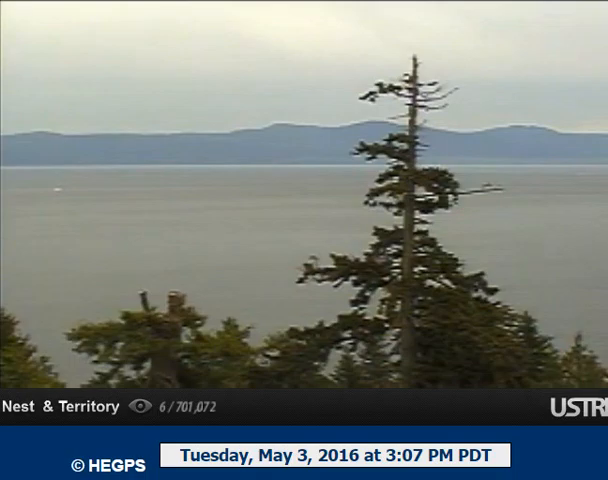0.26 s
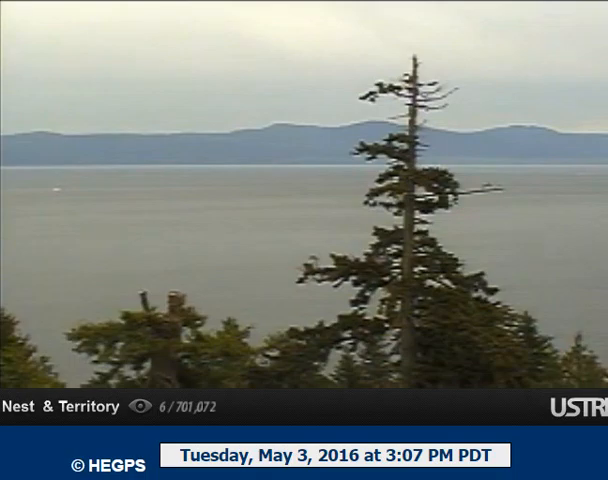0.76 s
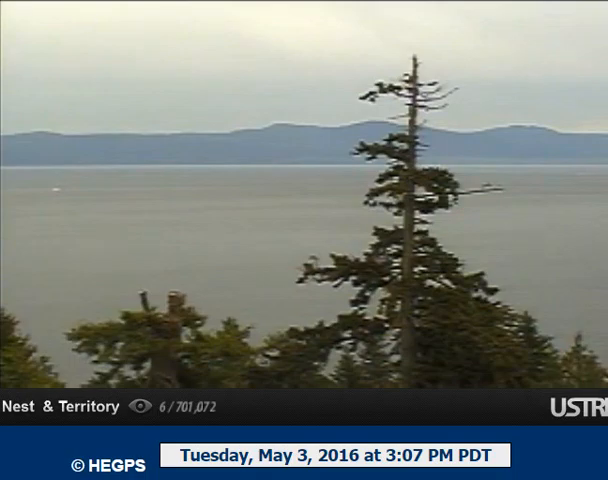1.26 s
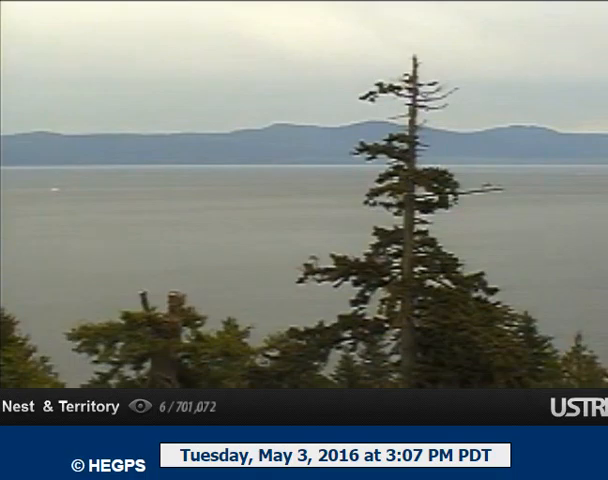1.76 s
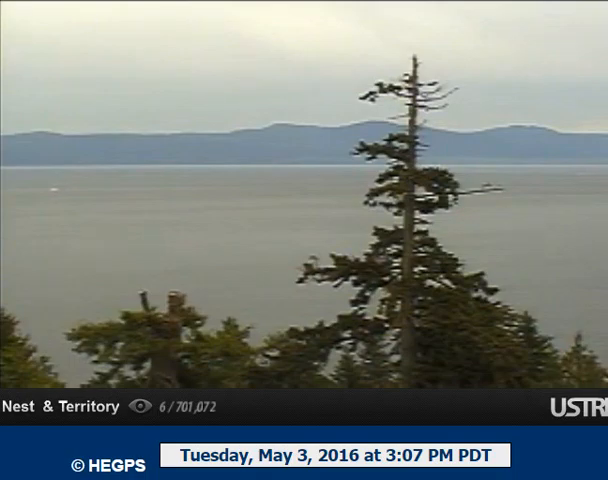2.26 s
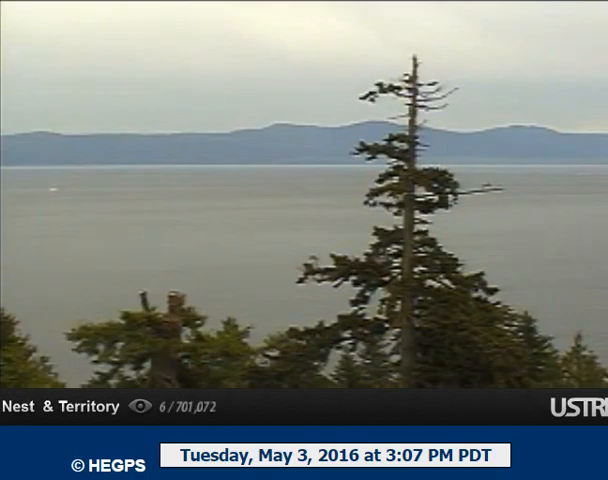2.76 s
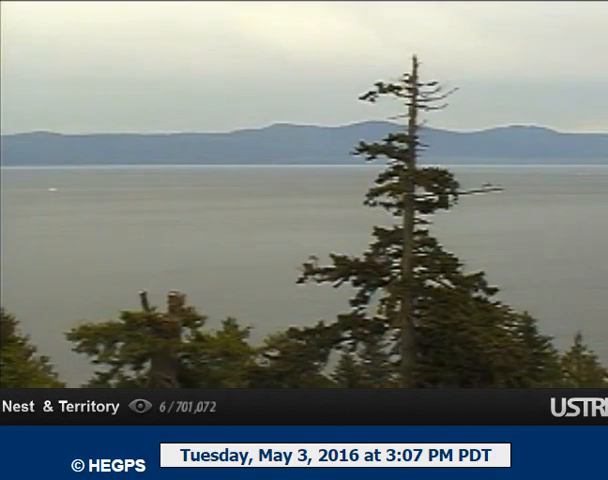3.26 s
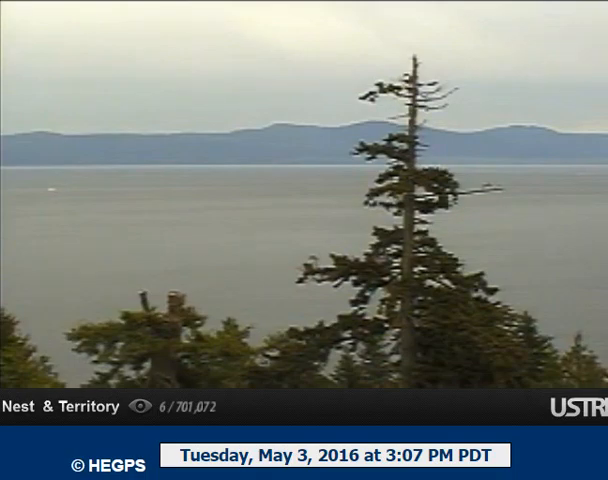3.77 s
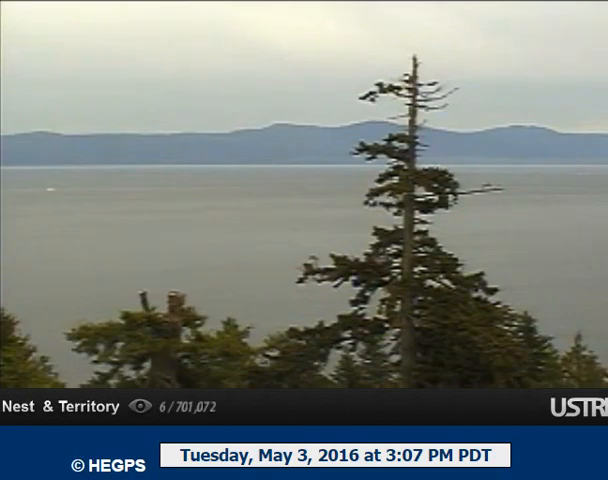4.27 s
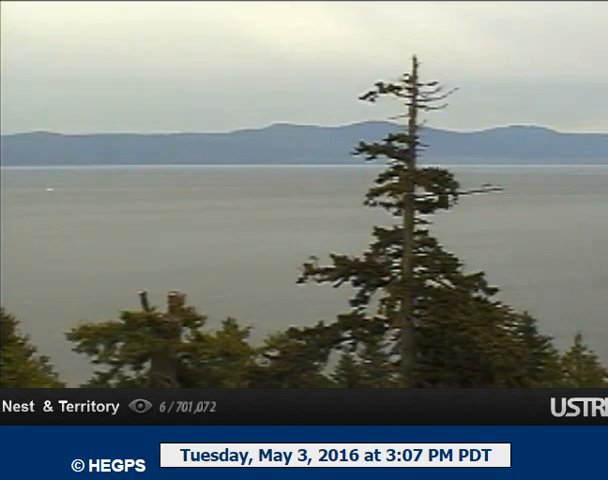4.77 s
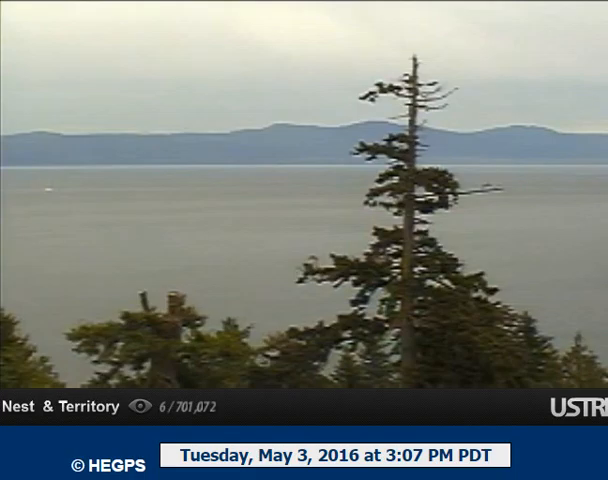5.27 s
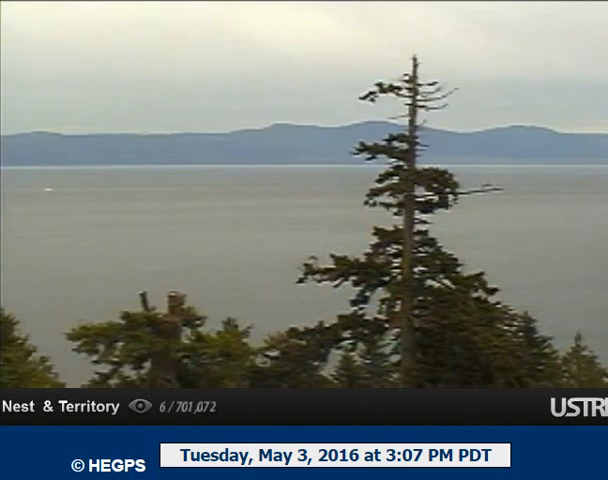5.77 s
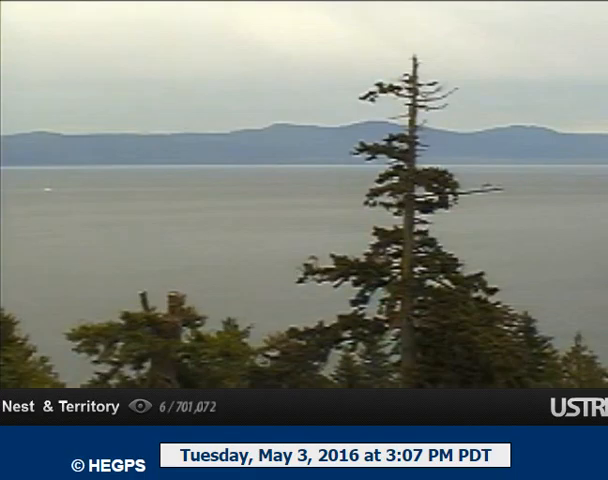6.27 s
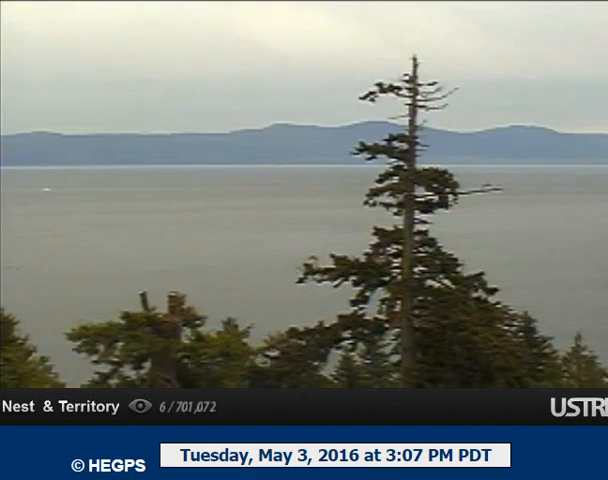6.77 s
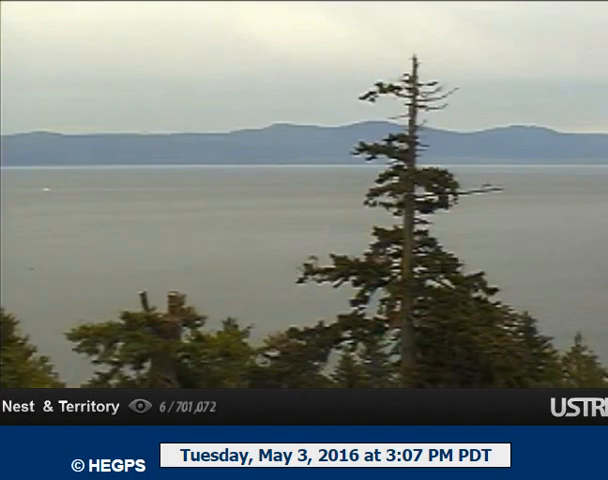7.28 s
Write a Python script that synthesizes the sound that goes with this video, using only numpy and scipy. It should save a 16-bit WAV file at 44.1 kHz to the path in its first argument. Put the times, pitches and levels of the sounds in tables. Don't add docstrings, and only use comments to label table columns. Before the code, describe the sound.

Heavy wind booms and thumps on a microphone while a pair of eagles chitter in short piping whistles, first together, then one alone.

```python
import sys
import numpy as np
from scipy import signal
from scipy.fft import rfft, irfft, next_fast_len
from scipy.io import wavfile
from scipy.ndimage import uniform_filter1d, map_coordinates

SR = 44100
rng = np.random.default_rng(int(sys.argv[2]) if len(sys.argv) > 2 else 0)


def inscribe(sig):
    pcm = np.round(np.clip(np.atleast_2d(sig).T, -1, 1) * 32767)
    wavfile.write(sys.argv[1], SR, pcm.astype(np.int16))


def ratio(d):
    e = np.asarray(d, float) / 20
    return 10 ** e


N = 332514

# time in seconds, level in dB.
WIND = [(0, -20), (.43, -17), (0.599, -18.5), (1.0, -19.5), (1.2, -17), (1.45, -15), (1.8, -18.5),
        (2.4, -16), (3.04, -18), (3.25, -15.5), (3.618, -16), (3.9, -17), (4.43, -16.5), (4.9, -17.5),
        (5.6, -14.5), (6.6, -18), (7.3, -16.5), (7.54, -17)]
# frequency in Hz, density in dB per Hz.
HOUSING_SPECTRUM = [(56, -27.5), (95, -4), (119, 4.5), (133, 1), (210, -21), (300, -37.5), (390, -58),
                    (660, -120)]
# time in seconds, change
# in dB.
EDDIES = [(.08, 0.5), (.43, 2), (.52, 1.5), (.86, 1), (.94, 0.5), (1.01, 4.5), (1.07, -6), (1.17, 2.5),
          (1.28, 0.5), (1.49, 2), (2.05, 2), (2.16, -3.5), (2.35, -0.5), (2.84, 3.5), (2.96, 0.5),
          (3.04, -3.5), (3.18, 4.5), (3.22, -8), (3.28, 2.5), (3.63, 3.5), (4.22, 1), (4.3, -1.5),
          (4.45, 3.5), (5.37, 1), (5.44, -3), (5.63, 1.5), (6.83, 1), (6.91, -3), (6.99, 3), (7.37, 5),
          (7.54, -4)]
# frequency in Hz, density in dB per Hz.
PORT_SPECTRUM = [(12, -50), (20, -11.5), (95, 3.5), (120, -29), (210, -120)]
# time in seconds, level over the buffet in dB.
PUFFS = [(.08, 6.5), (.52, 1), (.86, 6.5), (1.72, 2.5), (1.89, 3), (2.12, 7.5), (2.39, 8.5), (2.79, 0.5),
         (3.21, 1), (3.76, 6.5), (4.3, 4), (5.08, 10), (5.44, 9), (5.65, 6.5), (5.96, 4), (6.26, 11.5),
         (6.51, 10.5), (6.7, 8.5), (6.83, 15), (7.03, 10), (7.15, 11.5), (7.29, 7.5), (7.46, 10.5)]
# time of negative crest in seconds, peak in dB, pitch in Hz.
SURGES = [(.8683, -5.2, 120), (2.4044, -6, 120), (3.1596, -6, 120), (3.4, -6.2, 120), (3.6134, -5.4, 120),
          (4.1432, -6, 120), (4.2001, -6, 120), (5.0996, -6.2, 120), (5.6575, -5.5, 120),
          (6.2701, -5.8, 120), (6.5206, -3.6, 105), (6.817, -5, 115), (6.9727, -3.6, 122),
          (7.1004, -4.8, 120), (7.2058, -5.6, 125), (7.345, -4.8, 120)]
# time in seconds, dB over the clipping level.
CRESTS = [(1.9, .4), (2.0656, .9), (2.0737, 1), (2.1107, .4), (2.3534, .4), (2.3605, .4), (2.4002, 1),
          (2.4504, 1.2), (2.4576, .4), (2.4945, .4), (2.51, .6), (2.5876, .3), (2.947, 1.2), (2.9547, .7),
          (3.0047, .3), (3.3622, .3), (3.4206, .4), (3.4735, .3), (3.5139, .6), (3.7644, 1), (4.196, 1),
          (4.204, .7), (4.2196, .7), (4.2812, .5), (5.8138, .6), (6.2909, .8), (6.7851, .8), (6.798, .5),
          (7.0592, .8), (7.1118, 1.5), (7.1193, .5), (7.1336, .8), (7.1499, 1.5), (7.1628, 1),
          (7.2018, 1.5), (7.21, 1.2), (7.231, .4), (7.2692, 1)]
# frequency in Hz, density in dB per Hz.
TREES_SPECTRUM = [(140, -27), (230, 0), (276, -5), (345, -1), (468, -18), (563, -10), (719, -20.5),
                  (783, -18.5), (1280, -24), (1960, -32), (2170, -29), (3670, -36.5), (4300, -38),
                  (5590, -70.5), (9460, -120)]
# frequency in Hz, level in dB.
MAINS_OVERTONES = [(420, -65), (540, -73), (660, -60), (780, -62.5), (900, -64.5), (1020, -64), (1140, -65),
                   (1260, -63.5), (1380, -67.5), (1500, -76), (1620, -72), (1740, -67), (1860, -69.5),
                   (2100, -70), (2220, -67.5), (2340, -72.5), (2460, -75.5), (2580, -68.5), (2700, -72),
                   (2820, -67.5), (3060, -69), (3180, -70.5), (3300, -67.5), (3420, -78.5), (3540, -69),
                   (3660, -71.5), (3780, -71.5), (3900, -74)]

# hold start in seconds, hold length in seconds, from Hz, to Hz, level in dB.
FAR_BIRDS = [(0.107, .03, 1331, 1280, -51), (1.6, .06, 1610, 1348, -55), (3.971, .16, 3220, 2910, -60.5),
             (4.032, .13, 2750, 2650, -60), (6.12, 0.18, 3292, 3230, -60), (6.249, .08, 3274, 3130, -56.5),
             (6.333, .15, 3170, 3163, -62), (6.492, 0.016, 3117, 3095, -52.5)]
# hold start in seconds, hold
# length in seconds, from Hz, to Hz, level in dB.
CRY_UPPER = [(.232, .018, 2200, 2120, -59), (1.612, 0.016, 1430, 1617, -52.5),
             (1.628, .04, 1560, 1293, -49.5), (4.935, .04, 2130, 1987, -59),
             (5.415, 0.029, 2110, 2098, -57), (5.445, .05, 2070, 1903, -56), (5.53, .035, 2240, 2088, -60),
             (6.032, .022, 3290, 3355, -55), (6.115, .025, 3264, 3320, -57.5),
             (6.305, .02, 1800, 2104, -56.5), (6.36, .035, 3160, 3250, -57.5),
             (6.41, .06, 3145, 3250, -59.5)]
# hold start in seconds, hold length in seconds, from Hz, to Hz, level in dB.
CRY_LOWER = [(.215, .022, 2050, 1760, -57.5), (1.577, .035, 1150, 1230, -48.5),
             (4.915, .04, 1850, 1800, -55.5), (4.96, 0.027, 1720, 1606, -59),
             (5.49, 0.032, 1630, 1597, -57), (6.3, .05, 1400, 1275, -56.5)]
# hold start in seconds, hold length in seconds, from Hz, to Hz, level in dB.
HIGH_EAGLE = [(1.268, .012, 2890, 2928, -43), (1.29, .04, 2990, 3060, -50),
              (1.487, .035, 2953, 2950, -51.5), (1.53, .05, 3021, 3150, -53.5),
              (1.793, .065, 2906, 2859, -44), (1.862, .045, 2940, 2976, -46),
              (2.335, .055, 2810, 2908, -40), (2.395, .035, 2960, 3055, -40),
              (3.133, .005, 2860, 2904, -45), (3.227, .01, 2815, 2857, -40.5),
              (3.245, .035, 2860, 2840, -46.5), (3.3, .026, 2847, 2891, -38.5),
              (3.365, .032, 2960, 2975, -40.5), (3.49, .03, 2800, 2850, -42.5),
              (3.548, .014, 2960, 3070, -45.5), (3.81, .025, 2760, 2870, -37),
              (3.845, .045, 2985, 3070, -39.5), (3.957, .01, 2822, 2830, -47.5),
              (5.278, .025, 2890, 2900, -43), (5.31, .02, 2844, 2770, -45.5), (5.37, .046, 2790, 2924, -42),
              (5.432, 0.0042, 3000, 3000, -50.5), (5.696, 0.016, 2953, 2893, -48),
              (5.715, .025, 2862, 2820, -44.5), (5.749, .025, 2800, 2850, -43.5),
              (5.783, .1, 2902, 3014, -41), (6.129, .008, 2990, 2955, -49), (6.164, 0.038, 2945, 2858, -46),
              (6.232, .02, 2895, 2940, -38.5), (6.274, 0.026, 3022, 2990, -40.5),
              (6.652, .022, 2754, 2886, -38), (6.674, 0.037, 2932, 2922, -34.5),
              (6.744, .005, 2912, 2902, -48), (6.766, .022, 2892, 2945, -37.5),
              (6.797, 0.018, 2975, 3000, -46), (6.832, 0.018, 2977, 2987, -47),
              (6.856, 0.009, 2975, 2990, -45.5), (6.875, .006, 2920, 2840, -44),
              (7.055, 0.0088, 2750, 2844, -43.5), (7.072, 0.013, 2920, 2970, -40.5),
              (7.101, .122, 2922, 2984, -39), (7.23, .022, 3027, 2986, -43),
              (7.256, .016, 2983, 2955, -39.5), (7.466, .03, 2742, 2933, -49),
              (7.518, 0.018, 2890, 2870, -41.5)]
# hold start in seconds, hold length in seconds, from Hz, to Hz, level in dB.
CHIPS = [(1.768, .018, 2400, 2842, -51.5), (2.18, .01, 1854, 2150, -47.5), (2.324, .03, 1842, 1935, -51),
         (2.625, 0.01, 2438, 2283, -40.5), (2.847, .025, 2680, 2880, -48.5),
         (2.97, .015, 1870, 2074, -54.5), (3.108, 0.0045, 2348, 2240, -36), (3.549, .02, 2300, 2200, -54.5),
         (3.729, .01, 1860, 1880, -52.5), (3.973, .006, 2312, 2200, -45.5), (3.989, .01, 2244, 2260, -46.5),
         (4.376, .012, 2340, 2290, -42), (5.421, .01, 1720, 1793, -52.5), (5.679, 0.012, 2500, 2466, -53)]
# hold start in seconds, hold length in seconds, from Hz, to Hz, level in dB.
CLUCKS = [
    (1.772, .014, 1290, 1395, -41.5),
    (2.308, .016, 1384, 1407, -45.5),
    (2.845, 0.033, 1340, 1398, -46),
    (3.308, 0.017, 1365, 1433, -43),
    (3.727, .022, 1370, 1377, -50),
]
# hold start in seconds, hold length in seconds, from Hz, to Hz, level in dB.
LOW_EAGLE = [(1.872, .02, 2442, 2453, -40.5), (1.9, .15, 2470, 2584, -36.5),
             (2.062, .03, 2980, 3040, -35.5), (2.095, .022, 3052, 3094, -42.5),
             (2.328, .018, 2390, 2432, -38.5), (2.355, .065, 2466, 2438, -36.5),
             (2.43, .038, 2450, 2454, -30), (2.471, .052, 2460, 2620, -32), (2.529, .08, 2850, 2890, -35.5),
             (2.612, .035, 2895, 2954, -36), (2.676, .01, 3035, 3072, -37.5),
             (2.87, .083, 2350, 2529, -34.5), (2.957, .05, 2960, 2900, -33), (3.01, .028, 2924, 2805, -30),
             (3.041, .056, 2806, 2884, -31.5), (3.347, .008, 2340, 2350, -45.5),
             (3.372, .05, 2406, 2540, -41.5), (3.427, .085, 2880, 2912, -39.5),
             (3.538, .012, 2920, 2970, -38.5), (3.745, .07, 2320, 2470, -43.5),
             (3.828, 0.027, 2500, 2530, -49.5), (3.862, .082, 2933, 2890, -43),
             (4.187, .052, 2340, 2521, -39), (4.262, .034, 2570, 2616, -40.5),
             (4.303, .08, 2863, 2917, -42.5)]

# frequency in Hz, density in dB per Hz.
FUZZ_SPECTRUM = [(2530, -39), (4300, -0.5), (4410, 0), (4480, -24), (4560, -13), (4860, -1.5),
                 (7100, -11.5), (7900, -2), (8220, -2), (8510, -16), (9090, -23), (11800, -47.5),
                 (20000, -120)]

EDDY_S = .035
BUFFET_DB, PUFF_S = -24, .04
CREST_HZ, CREST_S, SURGE_S = 120, .0045, .009
RUSH_DB, RUSH_FOLLOWS = -40.5, 0.29
MAINS_HZ = 59.99
ATTACK_S, RELEASE_S = .014, .02
CLUCK_ATTACK_S, CLUCK_RELEASE_S = 0.01, .022
FAR_ATTACK_S, FAR_RELEASE_S = 0.021, 0.034
SCOOP_HZ = 39.73
LINK_S, LINK_DB = .065, -11
CLIP_UP, CLIP_DOWN, CLIP_HARD = .39, .535, 30
COUPLING_HZ, COUPLING_Q = 300, .7
SLIP_HZ, TOP_HZ = 3900, 9240
OUTPUT_CLIP = -.555


def unit(x):
    return x / np.sqrt(np.mean(x ** 2) + 1e-20)


def filtered(x, response):
    m = next_fast_len(N + 8192)
    spectrum = rfft(np.pad(x, 4096, mode="reflect"), m)
    return irfft(spectrum * response(np.fft.rfftfreq(m, 1 / SR)), m)[4096:][:N]


def noise(spectrum):
    hz, db = np.transpose(spectrum)

    def response(f):
        return ratio(np.interp(np.log(f + 1), np.log(hz + 1), db))

    return unit(filtered(rng.standard_normal(N), response))


def wobble(rate):
    knots = rng.standard_normal(int(N * rate / SR) + 4)
    return map_coordinates(knots, [np.arange(N) * rate / SR])


def steadied(x, span):
    power = np.abs(uniform_filter1d(x ** 2, size=span))
    return unit(x / (power + 0.033) ** 0.28)


def bumps(rows, width_s):
    t = np.arange(0, N, 64) / SR
    db_curve = sum(db * np.exp(-((t - s) / width_s) ** 2) for s, db in rows)
    return ratio(np.repeat(db_curve, 64)[:N])


def wind_db():
    return np.interp(np.arange(N) / SR, *np.transpose(WIND))


def boom():
    t = np.arange(N) / SR
    roar = ratio(wind_db() - 0.35) * bumps(EDDIES, EDDY_S) * steadied(noise(HOUSING_SPECTRUM), span=2200)
    roar = roar + ratio(BUFFET_DB) * bumps(PUFFS, PUFF_S) * steadied(noise(PORT_SPECTRUM), span=3500)
    limit = np.where(roar > 0, .41, .48)
    roar = roar / (1 + np.abs(roar / limit) ** 6) ** (1 / 6)
    swings = [(s, -ratio(db), hz, SURGE_S) for s, db, hz in SURGES]
    swings += [(s, CLIP_UP * ratio(db), CREST_HZ, CREST_S) for s, db in CRESTS]
    for s, peak, hz, width_s in swings:
        i = slice(round((s - .04) * SR), round((s + .04) * SR))
        hump = np.exp(-((t[i] - s) / width_s) ** 2)
        swing = peak * np.cos(2 * np.pi * hz * (t[i] - s))
        roar[i] = roar[i] * (1 - hump) + hump * swing
    return roar


def trees():
    gust_db = uniform_filter1d(wind_db(), size=SR // 2)
    level_db = RUSH_DB + RUSH_FOLLOWS * (gust_db - gust_db.mean()) + 0.98
    level_db = level_db + 1.1 * wobble(5) + 0.69 * wobble(22)
    return ratio(level_db) * noise(TREES_SPECTRUM)


def buzz():
    turn = 2 * np.pi * MAINS_HZ * np.arange(N) / SR
    hum = np.zeros(N)
    for hz, db in MAINS_OVERTONES:
        hum += np.sqrt(2) * ratio(db) * np.sin(round(hz / 60) * turn + (hz / 1500) ** 2)
    return hum


def whistles(notes, attack_s, release_s, flutter_db, waver_hz, rasp, rasp_hz):
    t = np.arange(N) / SR
    flutter = ratio(flutter_db * wobble(70))
    waver = waver_hz * wobble(120)
    flutter = flutter * (np.sqrt(1 - rasp ** 2) + rasp * unit(wobble(rasp_hz)))
    dip = np.clip(3 * (unit(wobble(160)) - 1.5), 0, 1)
    flutter = flutter * (1 - .3 * dip)
    effort, swell = np.zeros(N), np.zeros(N)
    for s, hold, _, _, db in notes:
        i = slice(max(round((s - attack_s) * SR), 0), round((s + hold + release_s) * SR))
        rise = 1 + (t[i] - s) / attack_s
        fall = 1 + (s + hold - t[i]) / release_s
        ramp = np.clip(np.minimum(rise, fall), 0, 1)
        effort[i] = np.maximum(effort[i], ramp)
        swell[i] = np.maximum(swell[i], ratio(db) * ramp ** 2)
    for (s, hold, _, _, db), (after, _, _, _, after_db) in zip(notes, notes[1:]):
        if after - s - hold < LINK_S:
            i = slice(round((s + hold) * SR), round(after * SR))
            effort[i] = 1
            swell[i] = np.maximum(swell[i], ratio(min(db, after_db) + LINK_DB))
    s, hold, from_hz, to_hz, _ = np.transpose(notes)
    glide = np.interp(t, np.ravel([s, s + hold], "F"), np.ravel([from_hz, to_hz], "F"))
    pitch = uniform_filter1d(glide, size=200) - SCOOP_HZ * (1 - effort) + waver
    tone = np.sin(2 * np.pi * np.cumsum(pitch) / SR)
    return np.sqrt(2) * uniform_filter1d(swell, size=400) * flutter * tone


def far_birds():
    calls = np.zeros(N)
    for voice in (FAR_BIRDS[::2], FAR_BIRDS[1::2]):
        calls += whistles(voice, FAR_ATTACK_S, FAR_RELEASE_S,
                          flutter_db=1.5, waver_hz=70, rasp=.95, rasp_hz=700)
    for voice in (CRY_UPPER, CRY_LOWER):
        calls += whistles(voice, CLUCK_ATTACK_S, CLUCK_RELEASE_S,
                          flutter_db=2, waver_hz=15, rasp=.25, rasp_hz=150)
    return calls


def eagles():
    calls = whistles(HIGH_EAGLE, ATTACK_S, RELEASE_S,
                     flutter_db=1.2, waver_hz=14, rasp=.11, rasp_hz=700)
    calls += whistles(LOW_EAGLE, ATTACK_S, RELEASE_S, flutter_db=1.3, waver_hz=13, rasp=.13, rasp_hz=800)
    for voice in (CLUCKS, CHIPS):
        calls += whistles(voice, CLUCK_ATTACK_S, CLUCK_RELEASE_S,
                          flutter_db=1.5, waver_hz=25, rasp=.3, rasp_hz=400)
    return calls


def scattered(calls):
    t = np.arange(SR // 2) / SR
    tail = rng.standard_normal(len(t)) * ratio(-60 * t / .45) * (t > .008)
    return calls + ratio(-17.0) * signal.fftconvolve(calls, tail / np.linalg.norm(tail))[:N]


def scene():
    birds = scattered(far_birds() + eagles())
    return (boom() + trees() + buzz() + birds)[None]


def overloaded(x):
    limit = np.where(x > 0, CLIP_UP, CLIP_DOWN)
    return x / (1 + np.abs(x / limit) ** CLIP_HARD) ** (1 / CLIP_HARD)


def coupled(x):
    def pole(hz):
        return COUPLING_HZ ** 2 - hz ** 2 + 1j * hz * COUPLING_HZ / COUPLING_Q

    return filtered(x - x.mean(), lambda hz: np.conj(pole(hz)) / pole(hz))


def rate_converted(x):
    slip = (SLIP_HZ * np.arange(N) / SR) % 1 - .5
    treble = filtered(x, lambda hz: hz > 2000)
    busy = np.sqrt(np.abs(uniform_filter1d(treble ** 2, size=250)))
    fuzz = (ratio(-76) + ratio(-39.5) * busy) * noise(FUZZ_SPECTRUM)
    return x + ratio(-0.48) * slip * np.gradient(x) + fuzz


def streamed(x, step_db, upward_db, quiet_db):
    z = signal.stft(x, nperseg=2048, window="cosine")[2]
    band = np.sqrt(np.mean(np.abs(z[:1024].reshape(128, 8, -1)) ** 2, axis=1))
    band = np.abs(uniform_filter1d(band, size=2, axis=1))
    high = (np.arange(128) >= 24)[:, None]
    below = np.max([np.pad(band, ((k, 0), (0, 0)))[:128] for k in (2, 3, 4)], axis=0)
    kept = band > np.maximum(ratio(np.choose(high, upward_db)) * below, ratio(quiet_db))

    def widen(v):
        return np.pad(np.repeat(v, 8, axis=0), ((0, 1), (0, 0)), mode="edge")

    step = widen(ratio(np.choose(high, step_db)) * band + 1e-9)
    rounded = widen(kept) * step * np.round(z / step)
    return signal.istft(rounded, nperseg=2048, window="cosine")[1][:N]


def band_limit(x):
    return signal.sosfilt(signal.butter(12, 15480, fs=SR, output="sos"), x)


def record(dry):
    x = coupled(overloaded(dry[0]))
    x = filtered(x, lambda hz: 1 / (1 + (hz / 3950) ** 40))
    x = rate_converted(x)
    bass = filtered(x, lambda hz: hz < 700)
    x = bass + streamed(x - bass, step_db=(-9, 3), upward_db=(-28.5, -18), quiet_db=-102.5)
    x = np.maximum(filtered(x, lambda hz: hz < TOP_HZ), OUTPUT_CLIP)
    x = x + ratio(-97.5) * rng.standard_normal(N)
    return band_limit(x[None])


dry = scene()
out = record(dry)
inscribe(out)
```